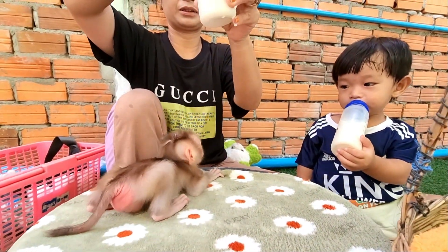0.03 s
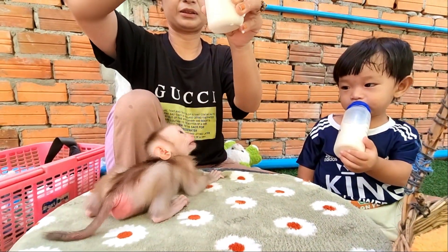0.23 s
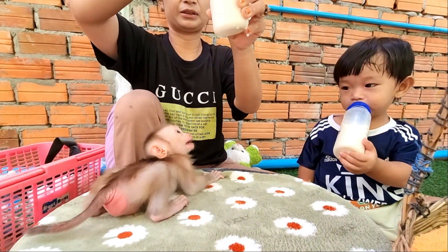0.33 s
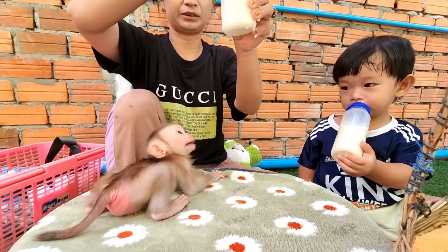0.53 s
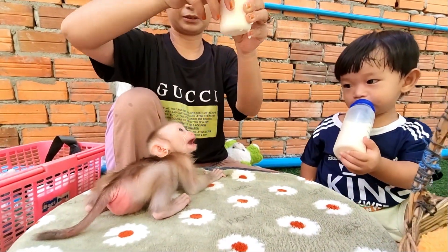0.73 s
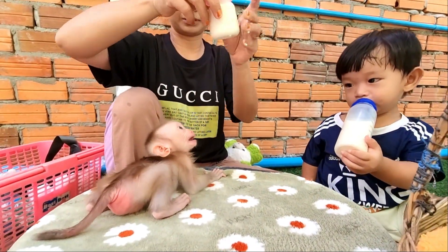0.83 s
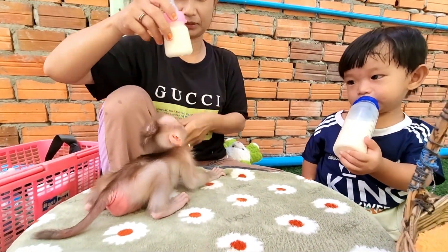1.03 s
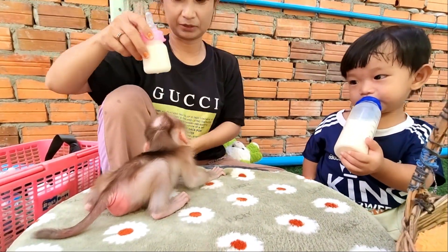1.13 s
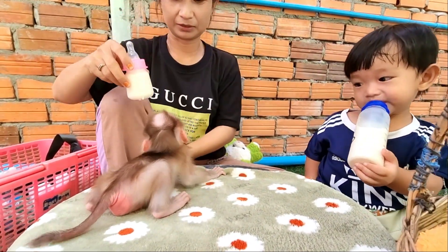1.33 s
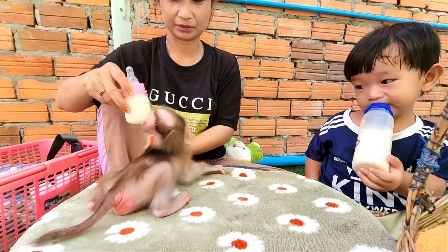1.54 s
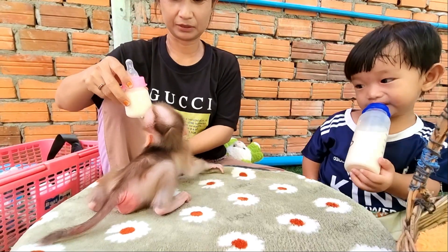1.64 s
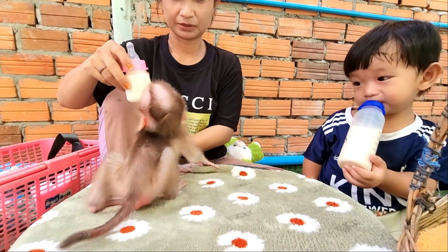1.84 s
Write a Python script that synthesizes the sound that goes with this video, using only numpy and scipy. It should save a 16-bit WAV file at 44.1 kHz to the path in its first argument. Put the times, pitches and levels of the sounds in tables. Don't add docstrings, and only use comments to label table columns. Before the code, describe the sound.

Close, raspy baby monkey shrieks come evenly, loudest at the third and fourth, then weaken to a moan, a faint gasp and a low rough grunt; hard walls ring briefly, a distant motor hums.

```python
import sys
import numpy as np
from scipy import signal
from scipy.fft import rfft, irfft, next_fast_len
from scipy.io import wavfile
from scipy.ndimage import uniform_filter1d

SR = 44100
rng = np.random.default_rng(int(sys.argv[2]) if len(sys.argv) > 2 else 0)


def dump(signal):
    limited = np.clip(np.atleast_2d(signal).T, -1, 1)
    pcm = np.round(limited * 32767).astype(np.int16)
    wavfile.write(sys.argv[1], SR, pcm)


def undo_db(level):
    steps = np.asarray(level, float) / 20
    return 10 ** steps


N = 83790
LEAD = 8192


def evened(x):
    return x / np.sqrt(np.mean(x ** 2) + 1e-20)


def read(points, hz, column=1):
    p = np.array(points)
    return np.interp(np.log(hz + 1), np.log(p[:, 0] + 1), p[:, column])


def drift(noise, size):
    return evened(uniform_filter1d(uniform_filter1d(noise, size), size))


def butter(x, order, hz, kind="low"):
    return signal.sosfiltfilt(signal.butter(order, hz, kind, fs=SR, output="sos"), x)


def tract(x, peaks):
    hz = np.abs(np.fft.fftfreq(2048, 1 / SR))
    power = sum(undo_db(db) ** 2 / (1 + (2 * (hz - f) / w) ** 2) ** 2 for f, w, db in peaks)
    log_gain = .5 * np.log(power * hz ** 4 / (hz ** 4 + 400.0 ** 4) + 1e-9)
    taps = np.fft.ifft(np.exp(np.conj(signal.hilbert(log_gain)))).real[:1024]
    return signal.oaconvolve(x, taps)[:len(x)]


def fold_drive(t, hz, level_db, rough, mouth, halving):
    jitter, jitter_s, slip_turns, strain = 0.1003, 0.0028, .12, .04
    shimmer_db, spread_rad = 3, .25
    puff_floor, breath_db = 0.32, -1
    dull_db, bright_db, dull_hz = -48, -35, 1900

    chance = rng.standard_normal((4, SR // 2))
    wobble, shimmer = (drift(v, round(jitter_s * SR))[:len(t)] for v in chance[:2])
    slip = drift(chance[3], 24)[:len(t)]
    turns = np.cumsum(hz * (1 + jitter * rough * wobble)) / SR
    turns = turns + slip_turns * (rough + strain * mouth) * slip

    folds = halving
    for k in range(1, 30):
        folds = folds + np.cos(2 * np.pi * k * turns + spread_rad * k ** 2) * (k * hz < 16000)
    alternation = 1 + halving * np.minimum(4 * rough, 1) * np.cos(np.pi * turns)
    folds = folds * np.sqrt(hz / 8000) * alternation * undo_db(shimmer_db * rough * shimmer)

    puffs = (puff_floor + np.exp(-(turns % 1) / .3)) * chance[2, :len(t)] * undo_db(breath_db)
    drive = 4.047 * undo_db(level_db) * (np.sqrt(1 - rough ** 2) * folds + rough * puffs)
    drive = drive * (t < t[-1])
    return drive, dull_hz, np.clip((level_db - dull_db) / (bright_db - dull_db), .05, 1)


# (frequency [Hz], width [Hz], level [dB])
OPEN_MOUTH = [(1250, 1740, -11), (3340, 2150, -3.5), (4376, 840, 3.5), (5410, 1900, -7.5),
              (6596, 230, -11.5), (8900, 2040, -23)]
SHUT_MOUTH = [(680, 495, 2.5), (1216, 940, 2.5), (1671, 234, 2), (4127, 950, -11.5), (10480, 7700, -30)]


def cry(rows, halving, ring_hz, ring_db, top_db, squeak_db):
    ring_width_hz, top_hz, top_width_hz = 520, 12450, 2000
    lead_in_hz, lead_in_s, lead_in_db = 3350, .012, -33
    onset_db, onset_s, onset_from_hz = 6, .009, 7000

    s, pitch_hz, effort_db, rough, mouth = np.transpose(rows)
    t = np.arange(s[0] - lead_in_s, s[-1] + 1024 / SR, 1 / SR)
    hz, level_db = np.interp(t, s, pitch_hz), np.interp(t, s, effort_db)
    rough = np.interp(t, s, np.clip(rough, 0, 1))
    mouth = np.interp(t, s, np.clip(mouth, 0, 1))

    drive, dull_hz, brightness = fold_drive(t, hz, level_db, rough, mouth, halving)
    drive = drive * (t > s[0]) * (t < s[-1])
    dull = butter(drive, 4, dull_hz)
    drive = dull + (drive - dull) * brightness

    ring = [(ring_hz, ring_width_hz, ring_db), (top_hz, top_width_hz, top_db)]
    sound = tract(drive * mouth ** 2, OPEN_MOUTH + ring) + tract(drive * (1 - mouth), SHUT_MOUTH + ring)
    edge = butter(sound, 4, onset_from_hz, "high")
    edge_db = onset_db * np.exp(-np.maximum(t - s[1], 0) / onset_s)
    sound = sound + edge * (undo_db(edge_db) - 1)

    swell = np.sin(np.pi / 2 * np.clip((t - t[0]) / lead_in_s, 0, 2)) ** 2
    squeak = swell * np.sin(2 * np.pi * lead_in_hz * t)
    squeak = squeak * undo_db(effort_db.max() + lead_in_db + squeak_db) * mouth[0] ** 2
    return round(t[0] * SR) + LEAD, sound + squeak


# (time [s], pitch [Hz], effort [dB], roughness [0-1], mouth opening [0-1])
FIRST_SHRIEKS = [
    [(-.06, 1110, -12, 0.25, 0.68), (-.005, 799.5, -35, .8, 0.72), (.018, 700, -52, 0.74, .6)],
    [(.233, 1346, -53, 0.6, .4), (.235, 1290, -23, 0.47, 0.4), (.2375, 1273, -32, 0.43, .3),
     (.241, 1250, -24.5, 0.34, 0.15), (.249, 1212, -22, 0.35, 0.55), (.257, 949, -26.5, 0.37, 0.5),
     (.266, 791, -28, .35, .55), (.272, 742, -33.5, 0.6, 0.6), (.3, 604, -54, 0.56, 1)],
    [(.429, 986.3, -49, 0.59, 0.5), (.4325, 1081, -29, 0.6, .5), (.434, 1146, -19, 0.42, 0.65),
     (.443, 1195, -20, 0.27, 0.63), (.451, 1099, -16, 0.52, 0.8), (.457, 1033, -23, 0.38, 0.45),
     (.476, 887, -28, 0.14, 0.71), (.488, 749, -40, 0.22, 0.75), (.505, 680, -66, .8, .6)],
]
LOUD_SHRIEKS = [
    [(.642, 1445, -38, 0.47, 0.89), (.647, 1750, -11.5, 0.23, 0.66), (.655, 1527, -18, 0.14, 0.92),
     (.664, 1305, -15.5, 0.19, 0.92), (.678, 1190, -19.5, .25, 0.94), (.682, 1130, -17.5, .3, 0.84),
     (.691, 1011, -19, .35, 0.63), (.706, 771, -27, 1, 1), (.725, 700, -77.5, 0.42, 0.83)],
    [(.862, 1672, -59, 0.45, 1), (.864, 1806, -17.5, .12, 0.89), (.873, 1918, -14.5, .06, 0.84),
     (.8755, 1855, -28.5, 0.059, 1), (.878, 1757, -11, .06, 0.73), (.883, 1540, -15.5, .05, 0.98),
     (.902, 1369, -21.5, .1, 0.88), (.916, 1001, -21, .5, 0.76), (.945, 840, -55.5, 0.46, 0.95)],
]
SINKING_CRY = [
    [(1.095, 806, -43.5, 0.056, 0.34), (1.103, 1094, -27.5, 0.073, 0.51), (1.119, 1184, -23, 0.041, 0.65),
     (1.127, 1065, -25.5, 0.11, 0.65), (1.134, 928.5, -27, 0.21, 0.72), (1.142, 789, -20, 0.6, 0.77),
     (1.147, 755, -36.5, 0.53, 0.52), (1.158, 720, -27, 0.98, 0.72), (1.175, 760, -41, 1, 0.41)],
    [(1.15, 746.3, -59, 0.81, 0.12), (1.17, 776.3, -34, 0.66, 0.51), (1.225, 528.5, -40, 0.78, 0.1),
     (1.27, 595.2, -37, .5, 0.045), (1.315, 628.4, -38.5, 0.39, 0.23), (1.342, 784, -31.5, 0.044, 0.024),
     (1.362, 680, -33, .03, .1), (1.392, 662.7, -39, 0.03, 0.1), (1.403, 641, -85, .1, .05)],
]
GRUNT = [
    [(1.553, 984, -75, 0.36, .017), (1.557, 1018, -44.5, 0.18, 0.017), (1.571, 981, -49, 0.23, 0.017),
     (1.576, 790.4, -43, 0.38, .03), (1.605, 700, -45.5, 0.39, .03), (1.655, 799, -41.5, 0.17, .05),
     (1.672, 688.6, -36, .25, 0.14), (1.692, 700, -34, 0.73, 0.21), (1.705, 700, -64, .5, .2)],
    [(1.69, 700, -37, 0.73, 0.15), (1.705, 835, -33, 0.31, 0.046), (1.72, 738, -41, 0.92, 0.043),
     (1.728, 718.4, -37.5, 0.39, .05), (1.748, 692, -38.5, 0.43, 0.052), (1.768, 680, -36, 0.58, 0.14),
     (1.778, 830, -32, 0.082, 0.07), (1.784, 776, -47, 0.25, .1), (1.795, 720, -55, 0.21, 0.12)],
]
# (strong-weak cycle alternation [0-1], throat ring [Hz], ring level [dB], top resonance [dB],
# lead-in squeak [dB])
VOICES = [
    (0.16, 2370, 1, -40, 0),
    (0, 2250, 3, -30.5, -8),
    (0.29, 3300, -1.5, -22.5, 0),
    (0, 5300, -2.5, -26, 5),
    (0.2, 5300, 0.5, -29, -1),
    (0, 2070, -3, -29, -3),
    (0.36, 2430, -8.5, -41, 0),
    (0.75, 2840, -0.5, -36, 0),
    (0.39, 2810, -1, -39, -2),
]


def monkey():
    out = np.zeros(N + LEAD)
    for rows, voice in zip(FIRST_SHRIEKS + LOUD_SHRIEKS + SINKING_CRY + GRUNT, VOICES):
        at, x = cry(rows, *voice)
        out[at:at + len(x)] += x
    return out


# (frequency [Hz], left lead [rad], left minus right [dB])
PORTS = [(200, 0.2, 5), (700, 1.29, 4), (1700, 2.22, 2.5), (2400, 1.73, -2.5), (4500, 2.52, -10.5),
         (4970, 4.5, -11), (7000, 8.24, 1), (16670, 25.8, -5.5)]


def ports(x):
    n = next_fast_len(len(x) + 2048)
    hz = np.fft.rfftfreq(n, 1 / SR)
    p = np.array(PORTS)
    lead_rad = np.interp(hz, p[:, 0], p[:, 1])
    half = (1j * lead_rad + np.log(undo_db(read(PORTS, hz, column=2)))) / 2
    return irfft(rfft(x, n) * np.exp(np.array([half, -half])), n)[:, :len(x)]


# (left delay [s], right delay [s], level [dB])
BOUNCES = [(.0021, .0026, -13), (.0047, .0041, -14), (.0079, .0088, -15)]


def bounces(x):
    taps = np.zeros((2, 1024))
    for left_s, right_s, db in BOUNCES:
        taps[[0, 1], [round(left_s * SR), round(right_s * SR)]] = undo_db(db)
    near = signal.oaconvolve(x, taps, axes=1)[:, :x.shape[1]]
    return signal.sosfilt(signal.butter(2, 1800, "high", fs=SR, output="sos"), near)


# (frequency [Hz], decay by 60 dB [s], level [dB])
WALLS = [(1200, 0.18, -19.5), (2720, 0.24, -6.5), (4460, 0.29, -18), (7000, 0.16, -7), (11960, 0.2, -18.5)]


def walls(x):
    taps = np.zeros((2, SR // 2))
    at = np.arange(500, SR // 2 - 20, 20)
    places = at + rng.integers(0, 20, (2, len(at)))
    np.put_along_axis(taps, places, rng.choice([-1., 1.], (2, len(at))), 1)
    hz, t, z = signal.stft(taps, SR, nperseg=256)
    t60_s = read(WALLS, hz)[:, None]
    decay_db = read(WALLS, hz, column=2)[:, None] - 60 * t / t60_s
    z = z * undo_db(decay_db) * np.sqrt(20 * np.log(1e6) / t60_s / SR)
    taps = signal.istft(z, SR, nperseg=256)[1]
    return signal.fftconvolve(x[None], taps, axes=1)[:, :len(x)]


def air(shape, level_db, side_db, patchy_db, size):
    frames, hz = 4 * N // size + 5, np.fft.rfftfreq(size, 1 / SR)
    a, b, c, d, patches = rng.standard_normal((frames, len(hz), 5)).T
    patches = evened(uniform_filter1d(uniform_filter1d(patches, 12, 0), 12, 1))
    inside = (hz >= shape[0][0]) & (hz <= shape[-1][0])
    gain = undo_db(read(shape, hz)[:, None] + patchy_db * patches) * inside[:, None]
    z = np.array([a + 1j * b, undo_db(side_db) * (c + 1j * d)]) * gain
    mid, side = signal.istft(z, nperseg=size, noverlap=3 * size // 4)[1][:, :N]
    return undo_db(level_db) * np.array([mid + side, mid - side]) / np.std(mid)


# (frequency [Hz], level [dB per Hz])
RUMBLE = [(15, -47), (28, -12.5), (80, -1.5), (227, -21.5), (330, -26), (430, -58.5), (730, -120)]


def rumble():
    rise_db = 4.5 * (np.arange(N) / N - .5)
    return air(RUMBLE, level_db=-50, side_db=-10.5, patchy_db=2.5, size=4096) * undo_db(rise_db)


# (frequency [Hz], level [dB per Hz])
HISS = [(150, -38.5), (250, -1.5), (751, -8.5), (1560, -16), (3090, -13.5), (4160, -12.5), (16200, -40)]


def outdoor_hiss():
    return air(HISS, level_db=-63, side_db=1, patchy_db=2.5, size=1024)


# (frequency [Hz], width [Hz], level [dB])
HUM = [(89.7, 10.6, -54.5), (171.4, 2.3, -59)]


def motor():
    depth, swell_db, swell_at_s, swell_s = .9, 7.5, .85, 0.074
    t, out = np.arange(N) / SR, 0
    for hz, width_hz, db in HUM:
        z = rng.standard_normal(N) + 1j * rng.standard_normal(N)
        waver = signal.lfilter([1], [1, -np.exp(-np.pi * width_hz / SR)], z)
        order = (1 + depth * waver / np.std(waver)) * np.exp(2j * np.pi * hz * t)
        out = out + undo_db(db) * evened(order.real)
    return out * undo_db(swell_db * np.tanh((t - swell_at_s) / swell_s) / 2)


# (time [s], length [s], level [dB], centre [Hz], width [Hz])
GASPS = [
    (.592, 0.054, -55.5, 4600, 2180),
    (1.437, 0.21, -60, 4120, 900),
]


def gasps():
    t, out = (np.arange(N + LEAD) - LEAD) / SR, 0
    for start_s, length_s, db, hz, width_hz in GASPS:
        hiss = evened(tract(rng.standard_normal(len(t)), [(hz, width_hz, 0)]))
        out = out + undo_db(db) * np.sin(np.pi * np.clip((t - start_s) / length_s, 0, 1)) * hiss
    return out


def scene():
    voice = monkey()
    background = rumble() + outdoor_hiss()
    room, hum = walls(voice), motor()
    direct = ports(voice + gasps())
    return (direct + bounces(direct) + room)[:, LEAD:] + background + hum


def low_pass(x):
    return signal.sosfilt(signal.butter(12, 16400, fs=SR, output="sos"), x)


def record(dry):
    band_limit = signal.firwin(255, 16200, fs=SR)
    overloaded = 1.19 * np.tanh(dry / 1.498)
    mix = signal.oaconvolve(overloaded, band_limit[None], "same")
    return low_pass(mix)


dry = scene()
out = record(dry)
dump(out)
```